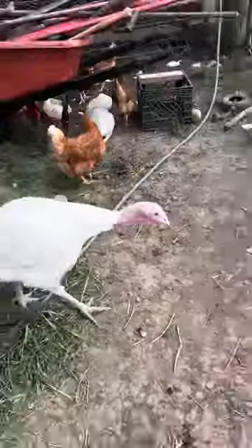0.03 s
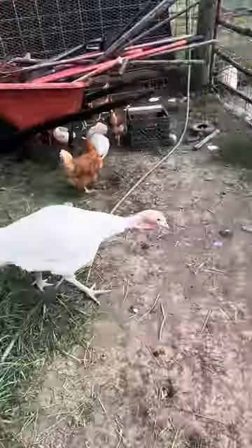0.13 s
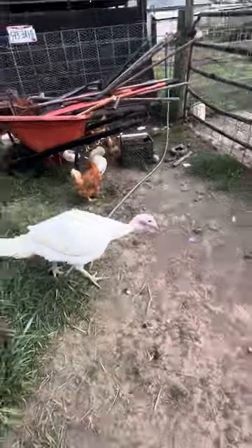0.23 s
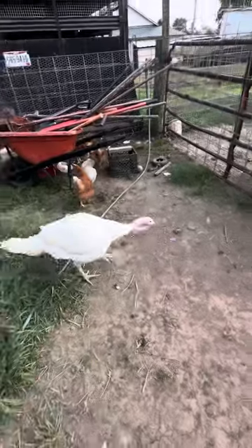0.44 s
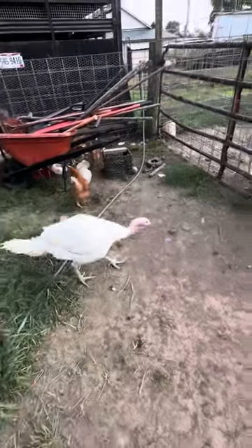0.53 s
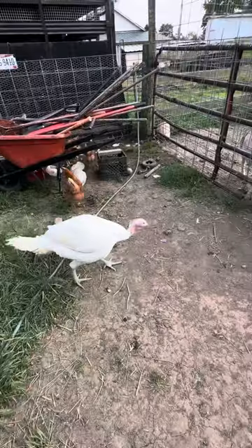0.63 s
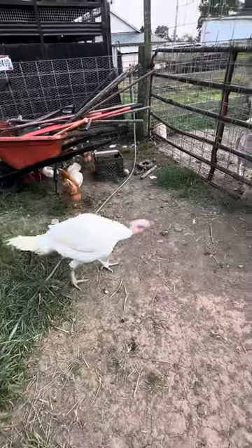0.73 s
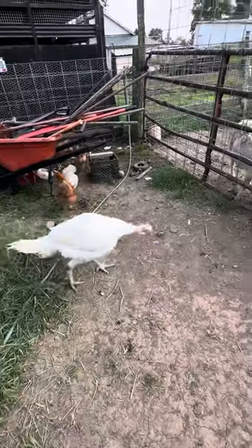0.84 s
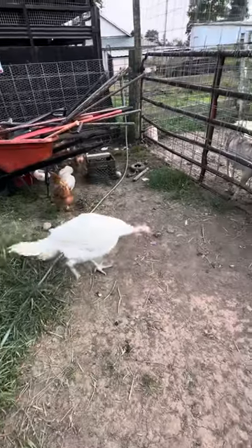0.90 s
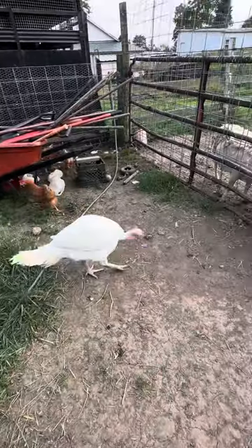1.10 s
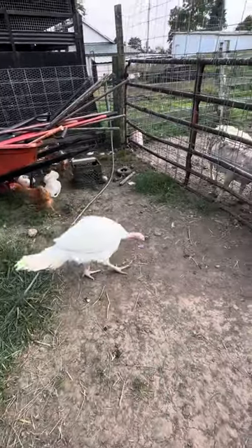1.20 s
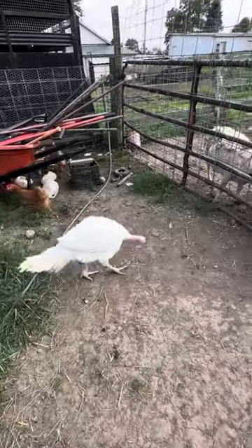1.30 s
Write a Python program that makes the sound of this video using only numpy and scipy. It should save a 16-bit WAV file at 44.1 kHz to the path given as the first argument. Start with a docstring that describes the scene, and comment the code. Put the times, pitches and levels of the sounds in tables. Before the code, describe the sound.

A sheep gives one long, nasal, hoarse bleat from about 0.1 to 1.1 seconds, quavering in some thirteen quick surges, strongest early and weaker after 0.8, with a short yard echo. A hen murmurs softly at 0.04. Soles scuff grit around 0.15 to 0.4; dull bumps and low wind buffeting recur, notably at 0.65 and 1.15. Faint, thin bird chirps follow from 1.1 to 1.35, over quiet air noise.

```python
"""A hen murmurs softly at the start: a short swell of coloured noise.
Then a sheep gives one long, quavering bleat in a farmyard: thirteen surges of pulses and breath noise, ringing
throat resonances that move as the mouth closes, with a short echo of the yard. Meanwhile soles scuff on grit,
footfalls and handling bumps thud as low pushes, some with a rustle, and wind buffets the ports as lumpy low noise.
Near the end a small bird chirps: thin whistles that bend in pitch. Faint steady air noise lies under it all."""
import sys
import numpy as np
from scipy import signal
from scipy.fft import rfft, irfft, next_fast_len
from scipy.io import wavfile
from scipy.ndimage import uniform_filter1d, map_coordinates

SR = 44100
rng = np.random.default_rng(int(sys.argv[2]) if len(sys.argv) > 2 else 0)


def transcribe(signal):
    """Save signal, clipped to [-1, 1], as a 16-bit WAV file at the path in sys.argv[1]."""
    frames = np.atleast_2d(signal).T
    limited = np.clip(frames, -1, 1)
    pcm = np.round(limited * 32767).astype(np.int16)
    wavfile.write(sys.argv[1], SR, pcm)


N = 59535
TIME = np.arange(N) / SR  # seconds
SIZE = next_fast_len(N + SR // 2)  # padded length, so that filter tails do not wrap round
FREQ = np.fft.rfftfreq(SIZE, 1 / SR)  # Hz

# surges of the bleat: (crest time [s], level of the low voice [dB], pitch at the crest [Hz],
# upper resonances relative to the low voice [dB], length [s], roughness [0-1])
SURGES = [(0.1162, -15.5, 153.8, 5, 0.029, 0.54), (.1995, -13.5, 150.5, 1.5, 0.025, 0.06),
          (.2810, -13.5, 155.7, 1, 0.025, 0.48), (.3645, -13, 153.1, 2, 0.021, 0.48),
          (0.45, -14, 154.3, 2.5, 0.023, 0.31), (.5255, -15.5, 151.6, 4, 0.024, 0.25),
          (0.6008, -17, 156.6, 3, 0.028, 0.15), (0.6795, -15.5, 155.5, -1, 0.028, 0.25),
          (.7590, -15, 150.3, -1.5, 0.027, 0.22), (0.8356, -18, 150.8, 0.5, 0.027, 0.2),
          (.9120, -20.5, 145.3, 4, 0.027, 0.22), (.9905, -17.5, 144.1, -7.5, 0.031, 0.31),
          (1.0708, -19.5, 139.2, -3.5, 0.035, 0.31)]
# throat resonances as the mouth moves: (time [s], first [Hz], second [Hz], third [Hz], fourth [Hz],
# width of the first [Hz], level of the second [dB], level of the third [dB])
THROAT = [(.12, 721, 1682, 2142, 2276, 60.4, -15, -11), (.28, 727, 1607, 2190, 2317, 59.4, -15, -10.5),
          (.45, 753, 1570, 2160, 2530, 58.8, -17, -14), (.6, 749, 1524, 2246, 2645, 55.7, -15.5, -12.5),
          (.69, 741, 1555, 2350, 2660, 65, -8.5, -15), (.82, 685, 1510, 2445, 2750, 116.6, -12.5, -10),
          (.91, 680, 1490, 2460, 2740, 184, -22.5, -8.5), (.99, 680, 1504, 2340, 2530, 52.7, -10, -17),
          (1.07, 652, 1526, 2410, 2650, 58.2, -14.5, -12.5)]
# fixed low resonances of the nose: (frequency [Hz], width [Hz], level [dB])
NOSE = [(605, 60, -17), (930, 90, -22)]
# tone colour of the thin rasp: (frequency [Hz], relative level [dB])
RASP_COLOUR = [(1500, 1.5), (2800, -4), (3500, -4.5), (4600, -8), (6500, -14.5), (9500, -27), (11500, -49)]
# side colour of the voice: (frequency [Hz], left minus right at full share [dB])
EAR_DIFFERENCE = [(300, 4.5), (600, -4.5), (770, -13), (1150, -3), (1600, -5), (2200, 5.5), (2700, 15),
                  (3500, -1.5), (8000, -4)]
# timing between the sides: (frequency [Hz], phase by which left leads [radians])
LEFT_LEAD = [(300, -3.1), (750, -1.47), (1300, -0.93), (2300, -1.3), (4000, -0.63)]
# how far the microphone points away from the sheep: (time [s], share of the side colour [0-1])
OFF_AXIS = [(.1, 0.72), (.5, 0.93), (.8, 0.82), (1.0, 0.46)]
# colour of the hen's murmur: (frequency [Hz], relative level [dB])
HEN_COLOUR = [(500, -9.5), (850, -13), (1170, -1.5), (1550, -20), (2000, -5), (2700, -21.5), (6000, -40.5)]
# bird notes: (start [s], length [s], start pitch [Hz], middle pitch [Hz], end pitch [Hz], level [dB])
CHIRPS = [(1.109, 0.008, 4900, 5400, 5500, -48), (1.126, 0.029, 3660, 4430, 3350, -48),
          (1.144, 0.023, 3600, 3510, 3700, -50.5), (1.179, 0.053, 3210, 3174, 2860, -53),
          (1.24, 0.027, 5600, 7140, 5600, -55), (1.251, 0.039, 5800, 5380, 4710, -49.5),
          (1.296, .032, 3900, 4700, 4260, -50.5), (1.322, 0.0147, 4700, 5120, 5130, -51),
          (1.331, .02, 3800, 3970, 3800, -50)]
# dull bumps of walking and handling: (time [s], level [dB], pitch of the push [Hz], rustle level [dB])
BUMPS = [(0.382, -34, 70.6, 3.5), (0.534, -28.5, 55.3, -37), (.625, -36, 74.5, -42),
         (1.178, -26.5, 79, -8.5), (1.307, -29.5, 58.6, -8), (1.335, -38, 137, 9)]
# colour of the rustle in a bump: (frequency [Hz], relative level [dB])
RUSTLE_COLOUR = [(25, 8.5), (65, -11), (130, 2), (300, 3.5), (600, -13), (2000, -50)]
# soles on grit: (time [s], level [dB], decay [s])
SCUFFS = [(0.138, -26.5, 0.019), (.315, -23.5, 0.0085), (0.34, -23.5, 0.014), (0.388, -34, .02)]
# colour of the grit: (frequency [Hz], relative level [dB])
GRIT_COLOUR = [(2000, -9.5), (5000, -0.5), (9500, -2.5), (11500, -25), (15500, -23.5)]
# wind on the ports, before flutter: (time [s], level [dB])
WIND_LEVEL = [(0, -56), (.06, -45), (.2, -41.5), (.35, -45), (.39, -28), (.47, -39.5), (.58, -30),
              (.645, -22), (.71, -43), (.87, -30), (.99, -36.5), (1.06, -32.5), (1.125, -23.5),
              (1.21, -39.5), (1.35, -35.5)]
# colour of the buffeting: (frequency [Hz], relative level [dB])
BUFFET_COLOUR = [(25, -28), (55, -11), (100, -4), (200, -5), (400, -13.5), (650, -14), (1000, -24),
                 (2000, -51.5), (5000, -56.5)]
# likeness of the wind at the two ports: (frequency [Hz], left-right correlation [-1 to 1])
WIND_ALIKE = [(30, 1), (70, -0.46), (140, -0.92), (300, -.93), (1000, -0.99)]
# how quickly the yard's echo dies: (frequency [Hz], time to fall 60 dB [s])
YARD_DECAY = [(200, 0.055), (800, 0.43), (2500, 0.23), (9000, 0.21)]
# colour of the echo: (frequency [Hz], level [dB])
YARD_COLOUR = [(300, -22), (760, -16), (1500, -15.5), (2100, -10.5), (2700, 2.5), (4000, 1), (9000, 2.5)]
# colour of the still air: (frequency [Hz], relative level [dB])
AIR_COLOUR = [(30, 4.5), (70, 14.5), (200, -1), (450, -30), (590, 7), (750, -10.5), (2000, -21.5),
              (5000, -21), (9500, -23), (12000, -51), (15500, -58.5)]
# likeness of the air noise on the two sides: (frequency [Hz], left-right correlation [-1 to 1])
AIR_ALIKE = [(50, -0.24), (600, 0.56), (4000, 0.13), (12000, 0.042)]

# pulses of the vocal folds
JITTER, SCATTER_DB = .008, .6  # random timing (share of a pulse gap) and random strength
SLIDE_PER_S = .5  # the gap between pulses grows by this share per second
DROOP, DROOP_S = .04, .035  # it also grows by DROOP at DROOP_S seconds on either side of the crest
PUFF_S = 0.0049  # decay of the air noise after each closing of the folds
# shape of a surge
EDGE_DB, FLATNESS, FLANK_LIMIT_DB = 5, 3, 30  # drop at the ends, flatness of the top, most that the flanks drop
TAIL, GAP_DB = 0.79, -67.5  # fall time over rise time; small floor added under the swell
UPPER_DEPTH, UPPER_LEAD_S = 0.65, 0.0018  # upper resonances quaver less deeply, and swell earlier
# filters of the voice
LOW_CUT_HZ, HIGH_CUT_HZ = 566, 2098
NOTCH_HZ, NOTCH_WIDTH_HZ, NOTCH_DEPTH = 1065, 390, 0.8  # the nose swallows a narrow band
CHEEK_HZ, CHEEK_WIDTH_HZ, CHEEK_DB = 1387, 204, -24.5  # a weak resonance under the second
FOURTH_DB = -14  # level of the fourth resonance
LOW_ROUGH, RASP_ROUGH, RASP_DB = .15, 0.72, -38.5  # breath in the low voice and in the rasp; level of the rasp
# other sources
HEN_S, HEN_SPREAD_S, HEN_DB = 0.038, 0.031, -35.5
THUD_RISE_S, THUD_DECAY_S = 0.0013, 0.013
BIRD_ECHO_DB, AIR_DB = -2, -42.5
TOP_HZ = 15800  # nothing is kept from here up


def sheep():
    """Vocal-fold surges ring the throat as shaped at that moment: clean below, hoarse above, thin rasp on top."""
    band = cut(LOW_CUT_HZ, "high", order=5) * cut(HIGH_CUT_HZ, "low", order=6)
    band = band * (1 - NOTCH_DEPTH * resonance(NOTCH_HZ, NOTCH_WIDTH_HZ))
    nose = sum(amp(db) * resonance(hz, width) for hz, width, db in NOSE)
    cheek = amp(CHEEK_DB) * resonance(CHEEK_HZ, CHEEK_WIDTH_HZ)
    rasp_filter = amp(RASP_DB + along(RASP_COLOUR))
    ears_db, lead = along(EAR_DIFFERENCE), along(LEFT_LEAD)
    sides = np.array([[.5], [-.5]])  # left and right each take half of the difference
    upper_widths_hz = [90, 200, 330]  # second to fourth resonance
    spectrum = 0
    for s, db, pitch_hz, upper_db, length_s, rough in SURGES:
        pulses, edges, puffs = rfft(np.array(folds(s, pitch_hz, length_s)), SIZE)
        first_hz, *upper_hz, first_width, second_db, third_db = at(THROAT, s)
        upper_gains = amp([second_db, third_db, FOURTH_DB]) * [1, -1, 1]
        low_filter = band * (resonance(first_hz, first_width) + nose)
        upper_filter = cheek
        for gain, hz, width in zip(upper_gains, upper_hz, upper_widths_hz):
            upper_filter = upper_filter + gain * resonance(hz, width)
        low = (pulses + np.sqrt(LOW_ROUGH * rough) * puffs) * low_filter
        upper = hoarse(edges, puffs, rough) * band * upper_filter
        rasp = hoarse(edges, puffs, RASP_ROUGH) * rasp_filter
        # level out the filter's own loudness, so that db sets the low voice
        level = amp(db) / np.sqrt(np.mean(abs(low_filter) ** 2) * pitch_hz / SR)
        voice = level * (low + amp(upper_db) * (upper + rasp))
        side_gain = amp(sides * ears_db * at(OFF_AXIS, s)[0])
        spectrum = spectrum + voice * side_gain * np.exp(1j * sides * lead)
    return irfft(spectrum, SIZE)[:, :N]


def folds(s, pitch_hz, length_s, count=12):
    """One surge of the vocal folds: deep pulses, their sharp edges, and the puffs of air that follow them."""
    offset = (np.arange(count) - count // 2 + 1) / pitch_hz  # seconds from the crest
    offset = offset * (1 + SLIDE_PER_S * offset / 2 + DROOP * (offset / DROOP_S) ** 2 / 3)
    offset = offset + JITTER / pitch_hz * rng.standard_normal(count)
    strength = amp(SCATTER_DB * rng.standard_normal(count))
    places = np.round((s + offset) * SR).astype(int)
    pulses = np.bincount(places, strength * swell(offset, length_s), N)
    edge_swell = swell(offset + UPPER_LEAD_S, length_s) ** UPPER_DEPTH
    edges = np.bincount(places, strength * edge_swell, N)
    puff = np.exp(-TIME[:SR // 100] / PUFF_S)
    puff_level = signal.fftconvolve(edges, puff / np.linalg.norm(puff))[:N]
    return pulses, edges, puff_level * rng.standard_normal(N)


def swell(offset, length_s):
    """A flat-topped surge, EDGE_DB down at the end of its rise, falling faster, whose flanks level out."""
    side_stretch = np.where(offset > 0, TAIL, 1)
    drop_db = EDGE_DB * abs(2 * offset / length_s / side_stretch) ** FLATNESS
    return amp(-FLANK_LIMIT_DB * drop_db / (drop_db + FLANK_LIMIT_DB)) + amp(GAP_DB)


def hoarse(edges, puffs, share):
    """Mix sharp edges with breath; share is the part of the power that is breath."""
    return np.sqrt(1 - share) * edges + np.sqrt(share) * puffs


def hen():
    """A short, hoarse murmur: coloured noise under a bell-shaped swell."""
    bell = np.exp(-.5 * ((TIME - HEN_S) / HEN_SPREAD_S) ** 2)
    return amp(HEN_DB) * bell * noise(HEN_COLOUR, alike=0.81)


def bird(waver=.012, flicker_db=3, rate=300):
    """Thin whistles whose pitch follows a curve through three points, unsteady in pitch and level."""
    out = np.zeros(N)
    for s, length, start_hz, middle_hz, end_hz, db in CHIRPS:
        progress = np.clip((TIME - s) / length, 0, 1)
        curve = np.polyfit([0, .5, 1], [start_hz, middle_hz, end_hz], 2)
        hz = np.polyval(curve, progress) * (1 + waver * wobble(rate))
        level = amp(db + flicker_db * wobble(rate)) * np.sqrt(abs(np.sin(np.pi * progress)))
        out += level * np.sin(2 * np.pi * np.cumsum(hz) / SR)
    return np.array([out, out])


def bumps():
    """Footfalls and handling bumps: each is one low push, some with a dull rustle."""
    thuds = 0
    for s, db, hz, rustle_db in BUMPS:
        push = 2 * np.sin(2 * np.pi * hz * (s - TIME))
        rustle = 2 * amp(rustle_db) * noise(RUSTLE_COLOUR, alike=1.0)
        thuds = thuds + amp(db) * blow(s, THUD_RISE_S, THUD_DECAY_S) * (push + rustle)
    return thuds


def scuffs(grit_rise_s=0.015, grain_db=4):
    """Soles scuff the grit: grainy noise that swells and dies away."""
    level = sum(amp(db) * blow(s, grit_rise_s, decay_s) for s, db, decay_s in SCUFFS)
    lumps = unit(uniform_filter1d(rng.standard_normal(N), size=30))
    grains = unit(amp(grain_db * lumps))
    return level * grains * noise(GRIT_COLOUR, alike=0.68)


def wind(flutter_db=6.0, rate=45):
    """Lumpy buffeting: low noise with a fluttering level, mostly opposed at the two ports."""
    level = amp(at(WIND_LEVEL, TIME)[0] + flutter_db * wobble(rate))
    return level * noise(BUFFET_COLOUR, along(WIND_ALIKE))


def yard(x):
    """Sheds and fences scatter a short tail of decaying noise, different at each ear."""
    hz, t, z = signal.stft(rng.standard_normal((2, SR // 2)), SR, nperseg=256)
    decay = amp(-60 * t / along(YARD_DECAY, hz)[:, None])
    tail = signal.istft(z * decay, SR, nperseg=256)[1]
    tail = tail / np.linalg.norm(tail[0])
    echo = signal.fftconvolve(x.mean(axis=0)[None], tail, axes=1)[:, :N]
    return filtered(echo, amp(along(YARD_COLOUR)))


def still_air():
    """A faint, steady bed of coloured noise."""
    return amp(AIR_DB) * noise(AIR_COLOUR, along(AIR_ALIKE))


def amp(db):
    """Decibels to gain."""
    return 10 ** (np.asarray(db) / 20)


def unit(x):
    """Scale to an average (rms) level of 1."""
    return x / np.sqrt(np.mean(x ** 2) + 1e-20)


def along(points, hz=FREQ):
    """Read a curve of (frequency, value) points, evenly by musical interval rather than by Hz."""
    f, v = np.transpose(points)
    return np.interp(np.log(hz + 1), np.log(f + 1), v)


def at(rows, s):
    """Each column of a curve at time s."""
    times, *cols = np.transpose(rows)
    return [np.interp(s, times, c) for c in cols]


def filtered(x, response):
    """x through a frequency response."""
    return irfft(rfft(x, SIZE) * response, SIZE)[..., :N]


def noise(colour, alike):
    """Coloured stereo noise of rms 1; alike is the left-right correlation, one value or one per frequency."""
    turn = np.arccos(np.clip(alike + 0 * FREQ, -.99, .99)) / 2
    shares = np.array([np.cos(turn), np.sin(turn)])
    mid, side = filtered(rng.standard_normal((2, N)), amp(along(colour)) * shares)
    return unit(np.array([mid + side, mid - side]))


def resonance(hz, width):
    """A ringing filter with a peak gain of 1, which responds only after it is struck."""
    return 1j * FREQ * width / (hz * hz - FREQ ** 2 + 1j * FREQ * width)


def cut(hz, kind, order):
    """A high-pass or low-pass filter without pre-ringing."""
    return signal.freqs(*signal.butter(order, hz, kind, analog=True), FREQ)[1]


def blow(s, rise_s, decay_s):
    """A quick swell and an exponential decay."""
    age = np.maximum(TIME - s, 0)
    return (1 - np.exp(-age / rise_s)) * np.exp(-age / decay_s)


def wobble(rate):
    """A smooth random curve with rate knots a second."""
    return map_coordinates(rng.standard_normal(N // 20), [TIME * rate])


def scene():
    """The animals in the yard, over bumps, scuffs, wind and still air."""
    bleat, chirps = sheep(), bird()
    echoes = yard(bleat + amp(BIRD_ECHO_DB) * chirps)
    return bleat + chirps + echoes + hen() + bumps() + scuffs() + wind() + still_air()


def record(dry):
    """The recorder rounds off the highest peaks, thins out the deepest bass and drops the extreme treble."""
    rounded = dry / (1 + abs(dry / .92) ** 8) ** (1 / 8)
    return filtered(rounded, cut(30, "high", order=3) * (FREQ < TOP_HZ))


dry = scene()
out = record(dry)
transcribe(out)
```